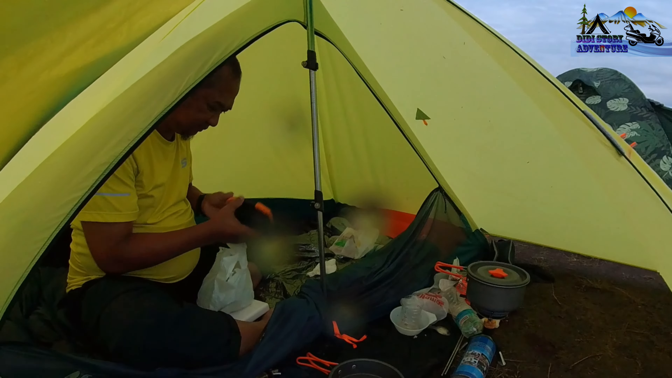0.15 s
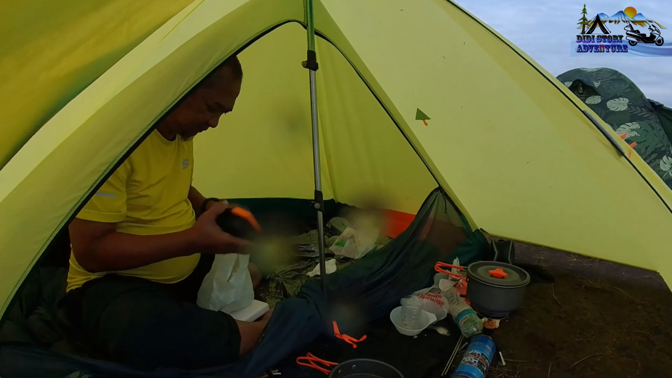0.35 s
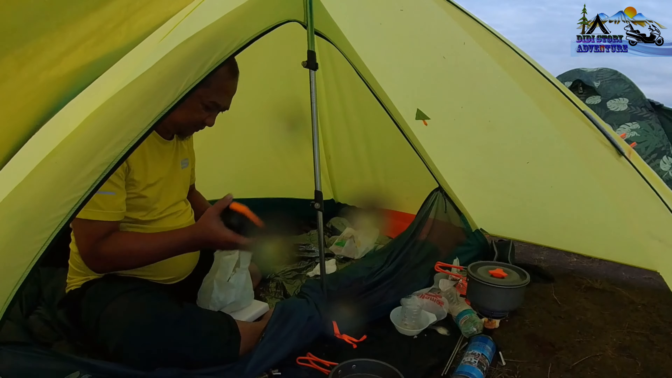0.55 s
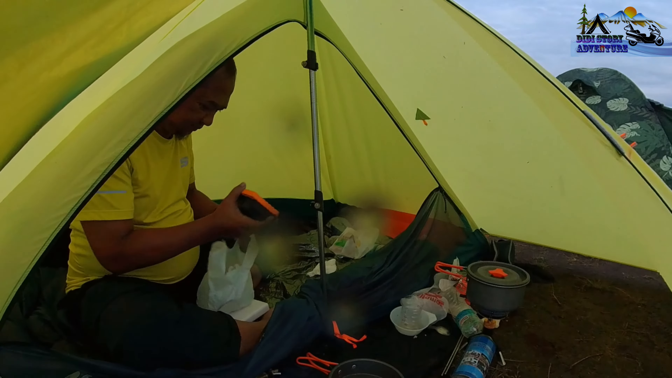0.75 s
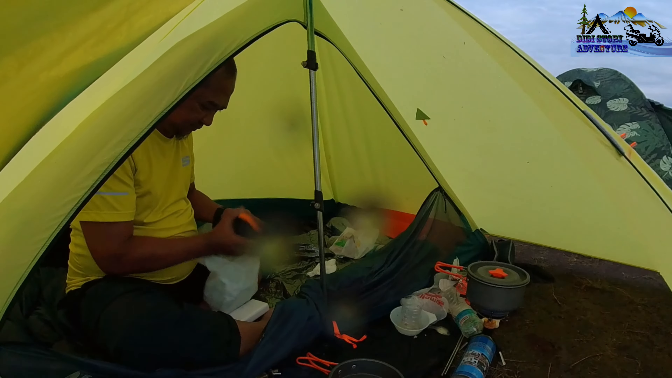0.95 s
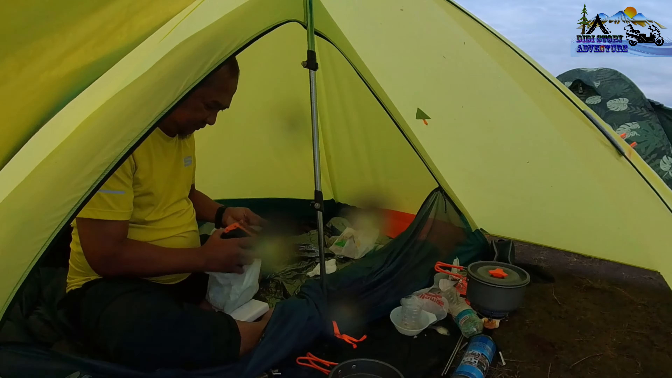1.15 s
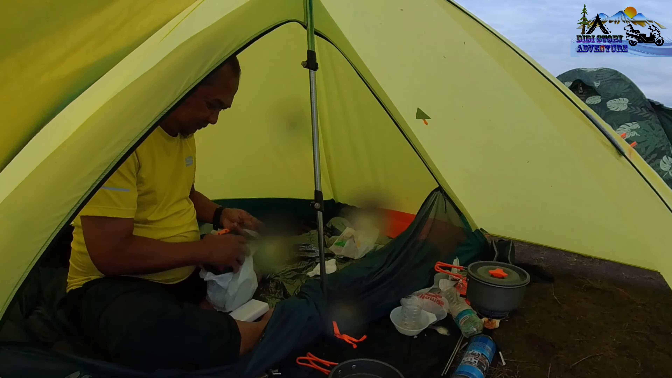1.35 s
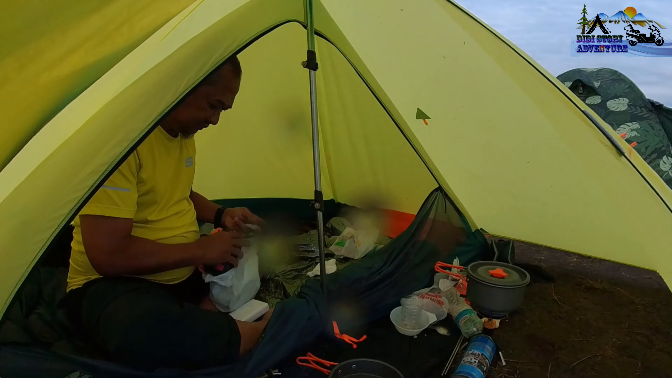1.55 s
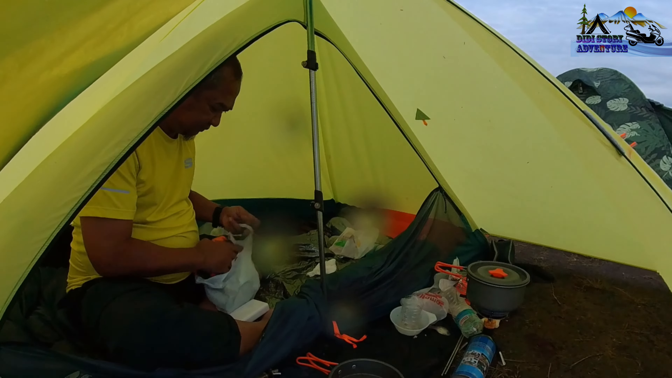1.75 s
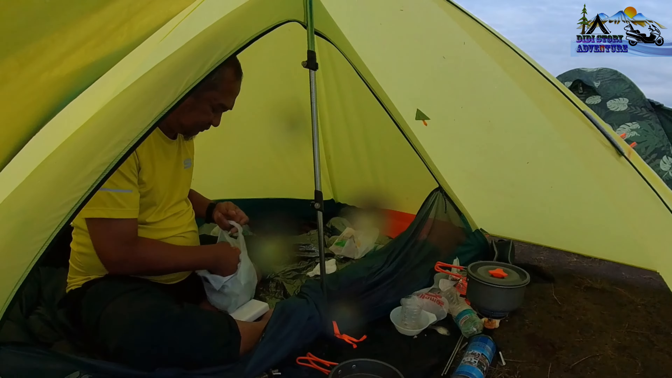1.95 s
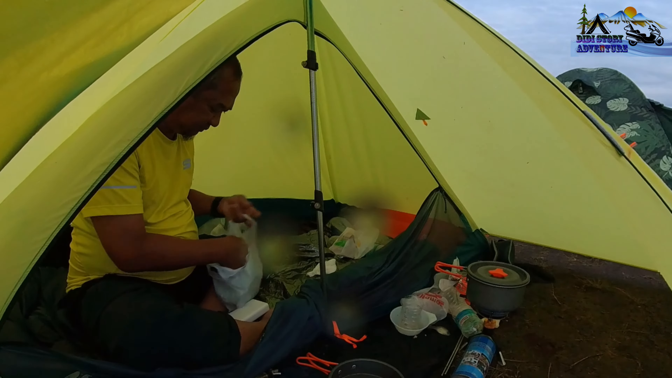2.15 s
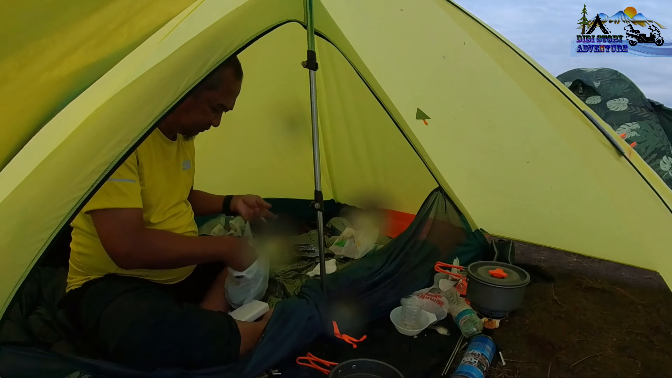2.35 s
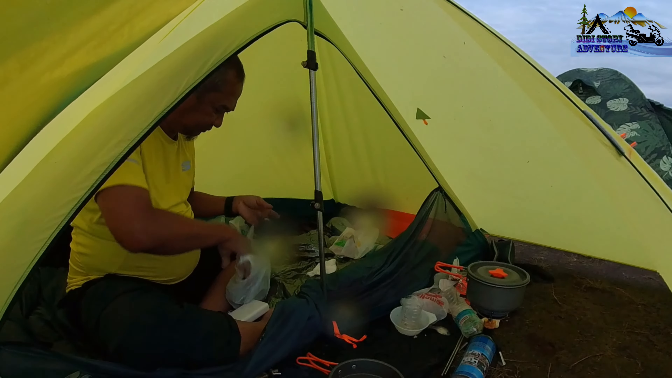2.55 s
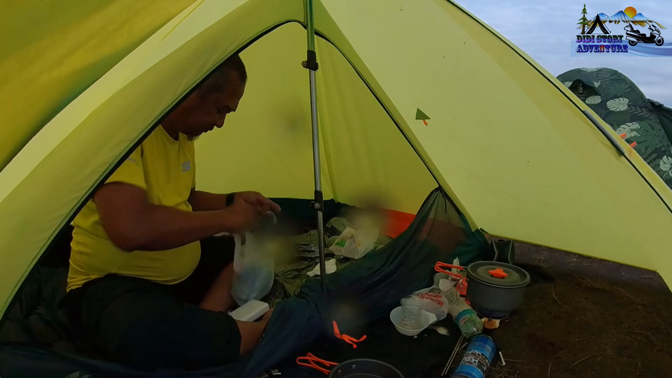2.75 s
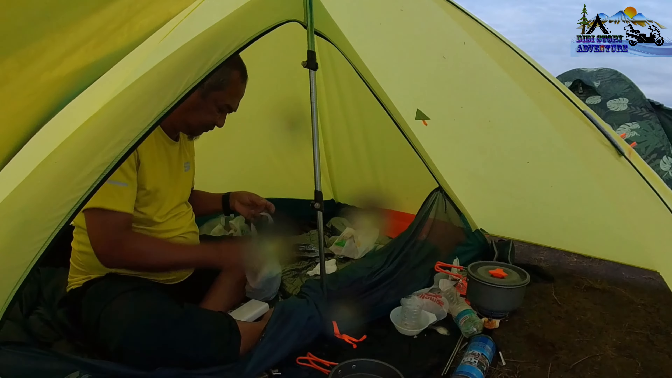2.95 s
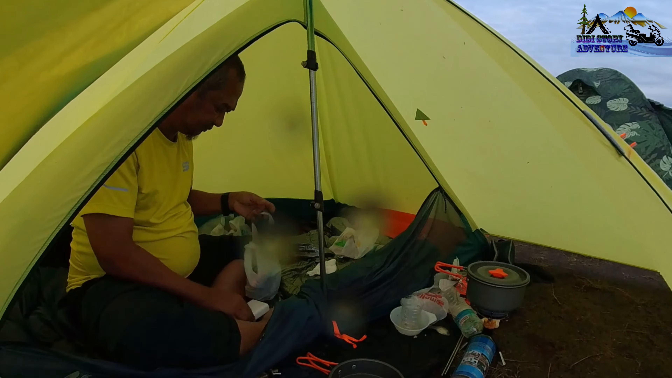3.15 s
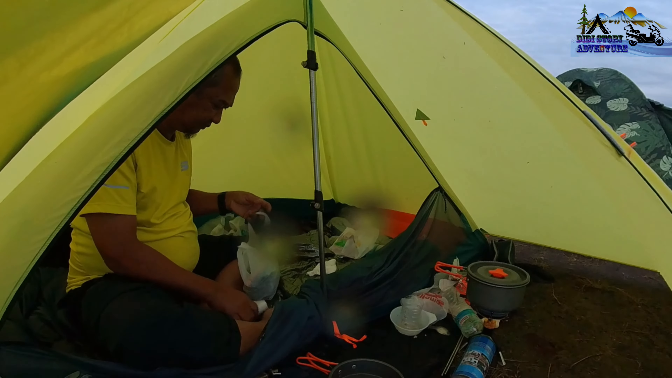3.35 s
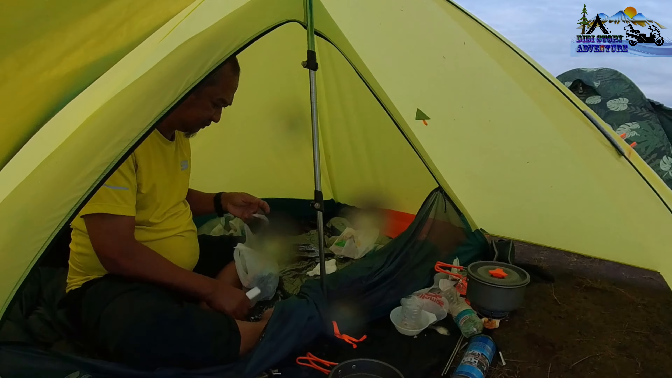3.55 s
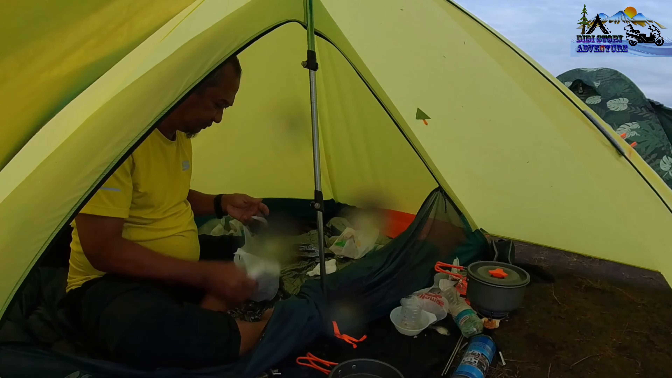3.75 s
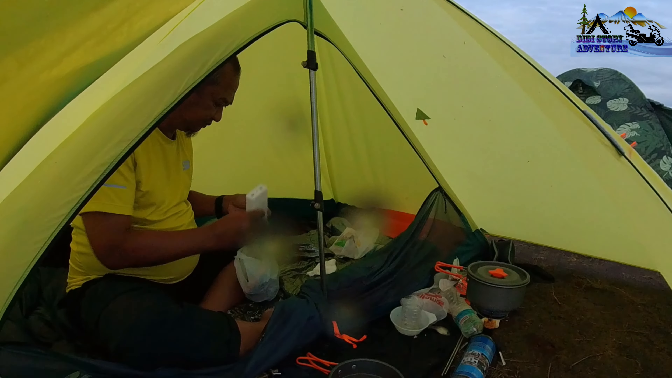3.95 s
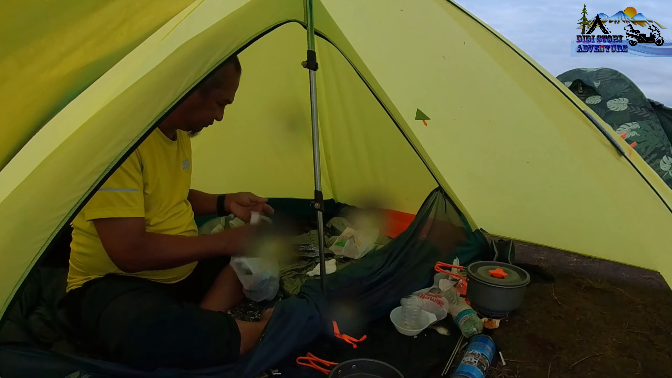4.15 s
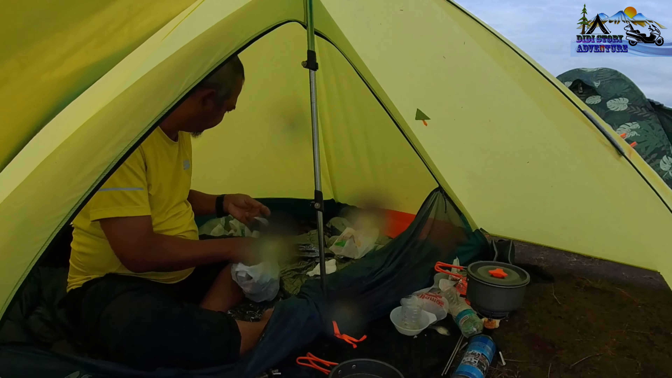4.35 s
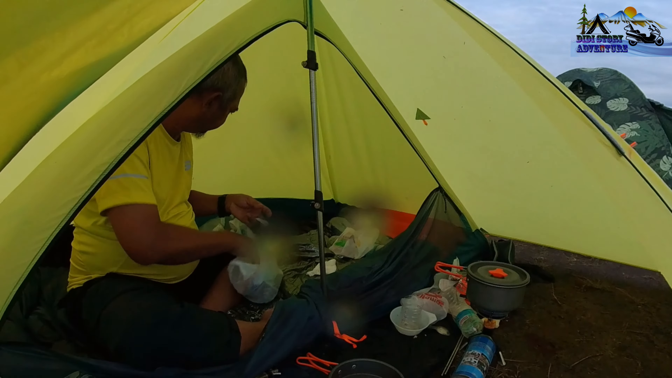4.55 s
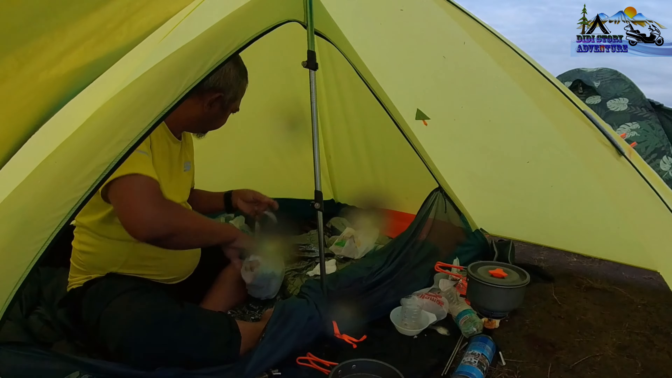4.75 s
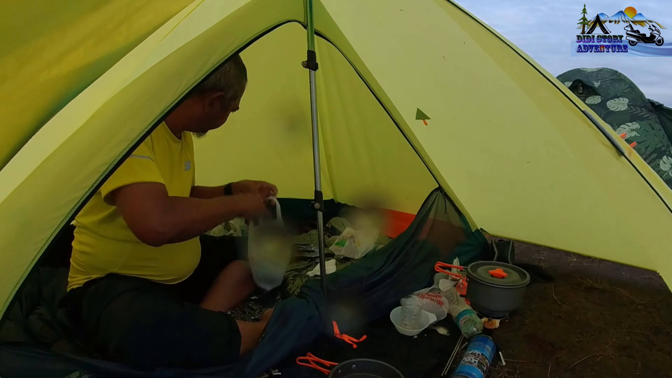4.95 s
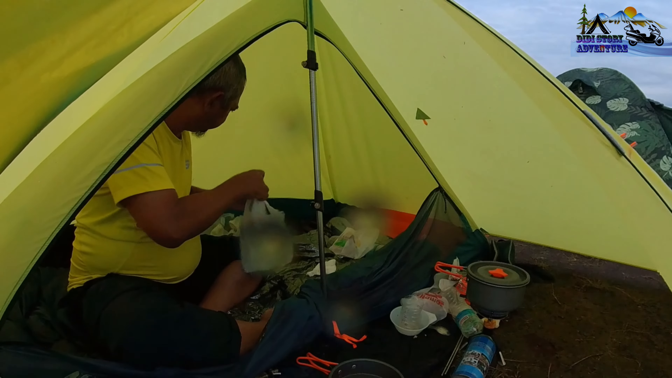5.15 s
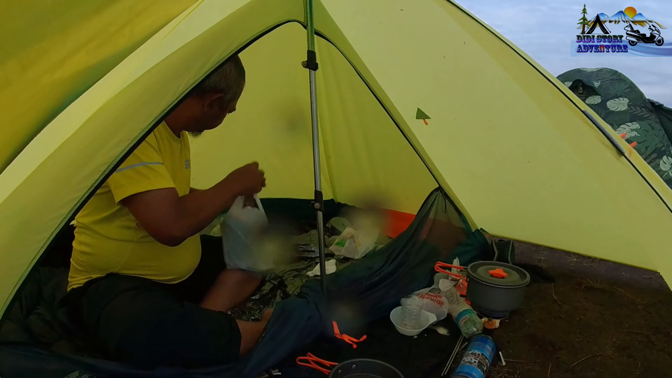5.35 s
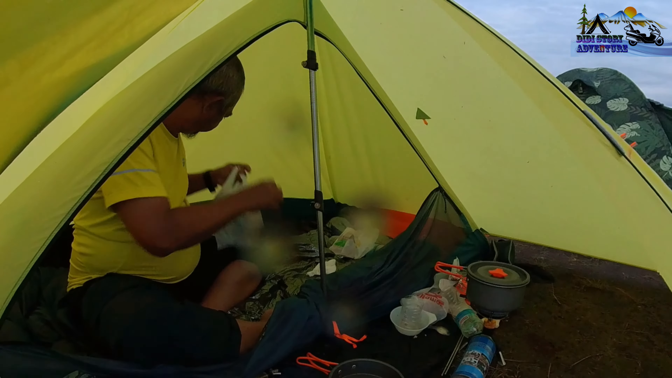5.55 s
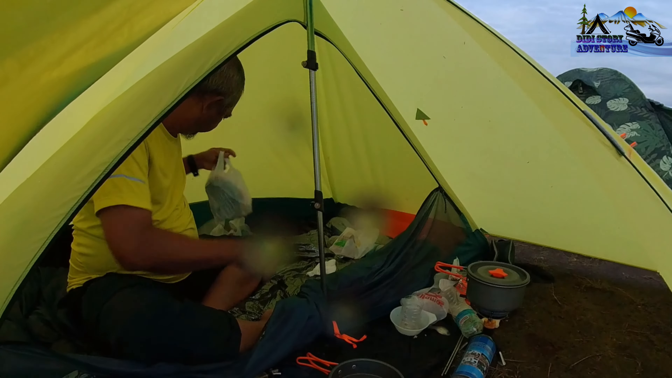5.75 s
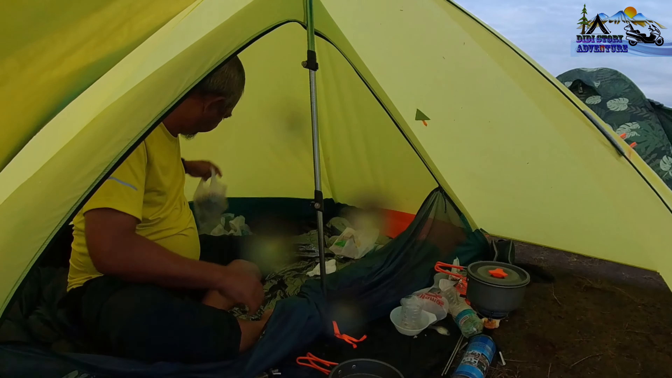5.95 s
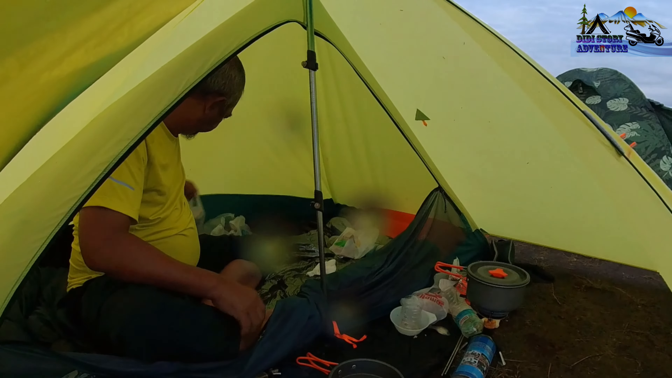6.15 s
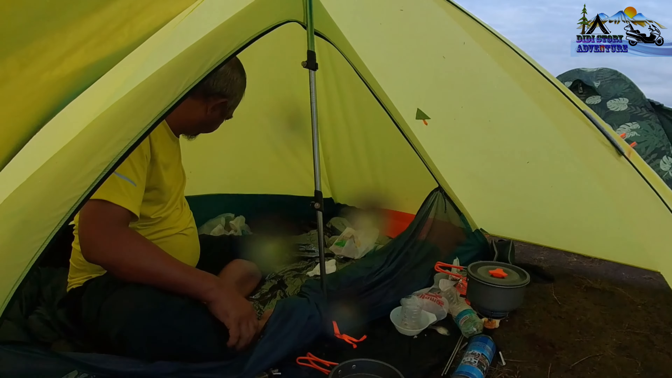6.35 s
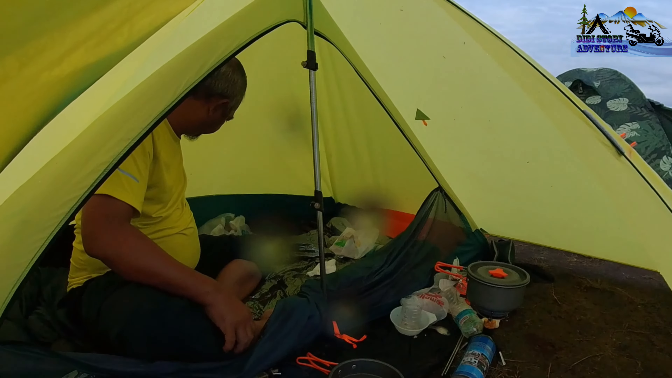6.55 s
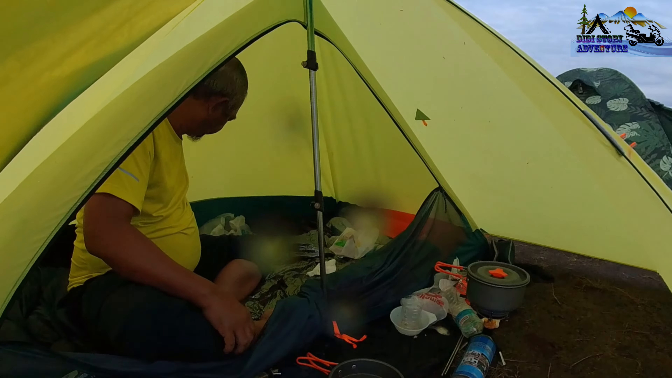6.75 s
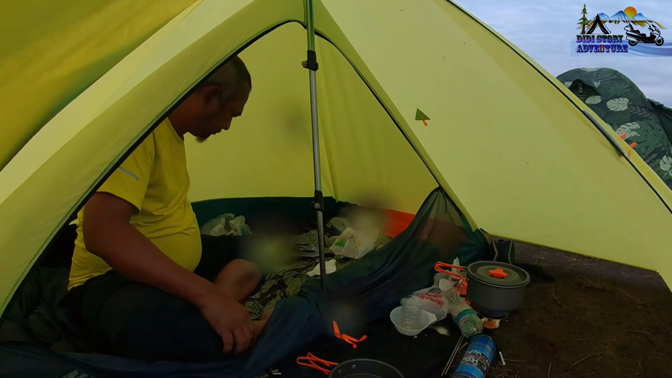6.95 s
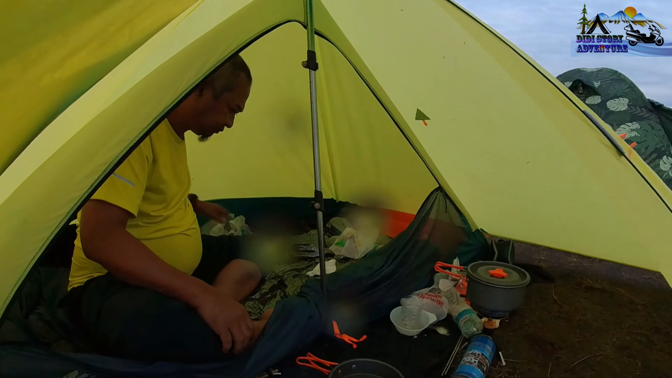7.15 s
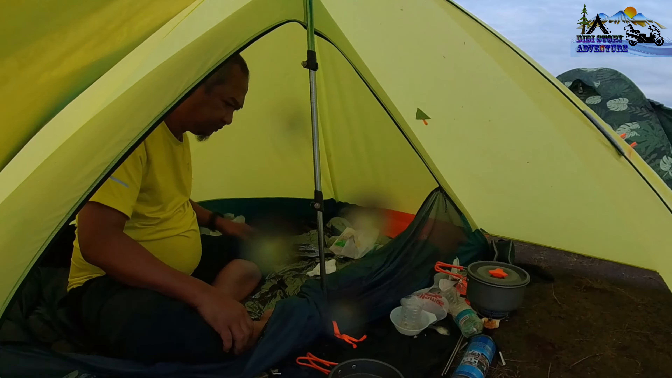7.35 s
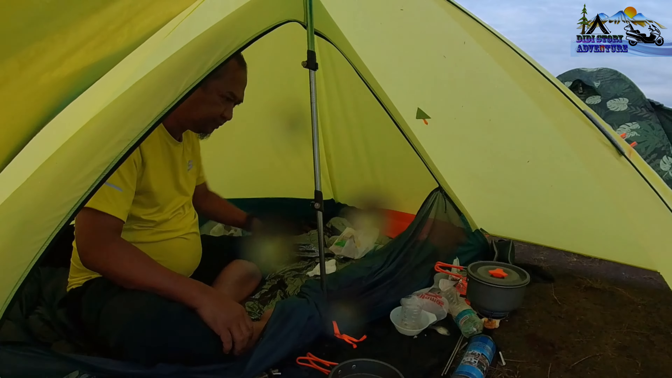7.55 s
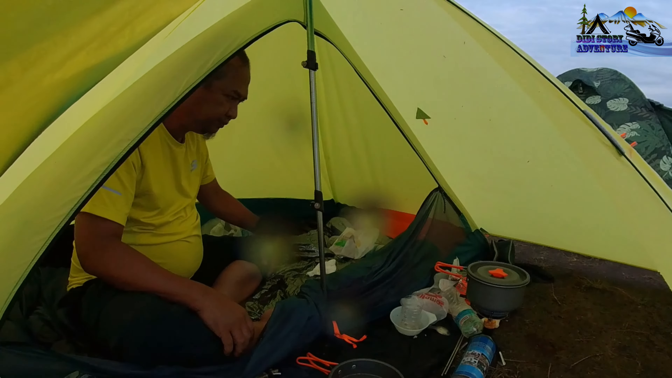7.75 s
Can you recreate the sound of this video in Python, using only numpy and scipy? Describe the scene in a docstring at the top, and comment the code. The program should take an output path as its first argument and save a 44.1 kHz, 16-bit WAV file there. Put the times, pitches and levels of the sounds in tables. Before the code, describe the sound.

A close, dry perspective inside a small tent, with very low, steady outdoor rumble and faint hiss. In the first 0.6 seconds a distant bird gives thin, fluttering whistles while plastic barely ticks. From 0.7 a thin bag is picked up and opened, with crisp bursts near 0.9, 1.1 and 1.4. From 1.6 to 3.2 gear is pushed in: dense bright crackle, sharp crumples, dull low throbs, and light knocks around 2.8. Rustling eases; a small hard case clacks in a quick cluster at 3.6. Gear knocks sharply at 4.4 and 4.7 with soft floor blows. The bag is lifted, crackling strongly to 5.2, then swung aside around 5.5. Quiet settling follows, with faint squeaks near 6.4. A muffled, flapping thump lands at 6.56, cloth drags until about 7.1, then near quiet with a very faint bird note at 7.6.

```python
"""Inside a tent, someone packs small gear into a thin plastic bag and puts it aside.
The bag crinkles in showers of tiny random snaps; a small case and loose gear clack as sets of dying tones.
Blows on the groundsheet are low dying tones with a flap, and clothing drags over it as coloured noise.
A far bird whistles in gliding tones, mostly at the start, over a low outdoor rumble of filtered noise."""
import sys
import numpy as np
from scipy import signal
from scipy.fft import rfft, irfft, next_fast_len
from scipy.io import wavfile
from scipy.ndimage import uniform_filter1d, map_coordinates

SR = 44100
rng = np.random.default_rng(int(sys.argv[2]) if len(sys.argv) > 2 else 0)


def to_wav(sig):
    """Store sig (one row per channel, or 1-D mono) as 16-bit WAV at the path in sys.argv[1].

    Samples outside -1..1 are clipped; the rate is SR.
    """
    pcm = np.clip(np.atleast_2d(sig), -1, 1) * 32767
    pcm = np.round(pcm).astype(np.int16)
    wavfile.write(sys.argv[1], SR, pcm.T)  # frames by channels


N = 348192  # length in samples
TIME = np.arange(N) / SR  # seconds


def amp(db):
    """Turn decibels into gain."""
    return 10 ** (np.asarray(db) / 20)


def unit(x):
    """Scale to an rms (average strength) of 1."""
    return x / np.sqrt(np.mean(x ** 2) + 1e-20)


def along(points, hz):
    """Read a curve of (Hz, value) points, joined on a log pitch axis."""
    point_hz, values = np.transpose(points)
    return np.interp(np.log(hz + 1), np.log(point_hz + 1), values)


def curves(rows):
    """Join the rows into one value per sample for each column after the time."""
    seconds, *columns = np.transpose(rows)
    return [np.interp(TIME, seconds, column) for column in columns]


def wobble(rate):
    """A smooth random curve through `rate` random points a second."""
    points = rng.standard_normal(int(N * rate / SR) + 4)
    return map_coordinates(points, [TIME * rate])


def dying(t, t60):
    """A fade that falls by 60 dB in t60 seconds."""
    return np.exp(-np.log(1000) * t / t60)


def filtered(x, response):
    """Multiply the spectrum of x by a response that depends on frequency."""
    size = next_fast_len(N + SR // 2)
    hz = np.fft.rfftfreq(size, 1 / SR)
    return irfft(rfft(x, size) * response(hz), size)[..., :N]


def coloured(x, spectrum):
    """Give white sound a spectrum while keeping its power."""
    return filtered(x, lambda hz: unit(amp(along(spectrum, hz))))


def add(track, s, sound):
    """Mix a sound into a track from time s, in seconds."""
    part = track[max(round(s * SR), 0):][:len(sound)]
    part += sound[:len(part)]


def patches(shape, frames):
    """A smooth random field over pitch and time, rms 1."""
    field = uniform_filter1d(rng.standard_normal(shape), size=3, axis=0)
    return unit(uniform_filter1d(field, size=frames, axis=1))


def crackle(rate, spread_db, hiss_db):
    """Tiny snaps of uneven size at random moments, `rate` a second, over a rubbing hiss, rms 1."""
    size_db = spread_db * np.clip(rng.standard_normal(N), -2, 2)
    size = amp(size_db) * rng.choice([-1, 1], N)
    snaps = unit(size * (rng.random(N) < rate / SR))
    return unit(snaps + amp(hiss_db) * rng.standard_normal(N))


def patchy(x, depth_db):
    """Each fold favours its own pitches for a moment: random patches get louder or softer."""
    z = signal.stft(x, nperseg=512)[2]
    z = z * amp(depth_db * patches(z.shape, 9))
    return unit(signal.istft(z, nperseg=512)[1][:N])


def swells(rows):
    """Short pure tones that swell and fade along a bell-shaped curve."""
    out = np.zeros(N)
    for s, hz, db, half_length in rows:
        bell = np.exp(-((TIME - s) / half_length) ** 2)
        out += amp(db) * bell * np.sin(2 * np.pi * (hz * TIME + rng.random()))
    return out


def ring(modes, scatter_db, attack=0.00078):
    """One blow on a body: its tones start at new random strengths and die away, peak 1."""
    hz, db, t60 = np.transpose(modes)[:, :, None]
    t = np.arange(SR // 4) / SR
    gain = amp(db + scatter_db * rng.standard_normal(hz.shape))
    wave = np.sum(gain * dying(t, t60) * np.sin(2 * np.pi * hz * t), axis=0)
    wave = wave * (1 - np.exp(-t / attack))
    return wave / np.abs(wave).max()


# Colour of the outdoor air. Each row: frequency in Hz, relative strength in dB.
AIR_COLOUR = [(12, -47), (20, -13), (74, 1.5), (161, 1), (340, -10), (501, -18), (1140, -26.5), (1560, -28),
              (2670, -23.5), (3200, -24.5), (3930, -24.5), (6750, -31), (7490, -14), (8520, -28),
              (9440, -36), (12300, -71), (20800, -120)]


def air():
    """Steady low outdoor rumble with a faint hiss: noise filtered to the colour of the air."""
    return amp(-62.5) * coloured(rng.standard_normal(N), AIR_COLOUR)


# Whistles of the far bird. Each row: start in seconds, length in seconds,
# pitch in Hz at the start, at the middle and at the end, relative level in dB.
BIRD_NOTES = [(.02, .08, 2960, 2900, 2900, -76), (.1, .17, 2714, 2694, 2810, -71),
              (.22, .13, 2740, 2880, 3100, -72), (0.384, 0.083, 2620, 2540, 2630, -66),
              (.43, 0.12, 2420, 2285, 2170, -76), (.52, .06, 2550, 2590, 2690, -67),
              (.565, 0.043, 2700, 2580, 2420, -63), (7.599, 0.23, 2210, 2000, 2140, -80)]
NOTE_FADE_S = 0.013  # rise and fall of a note


def bird(waver=0.0077, echo_db=-11, echo_t60=0.51):
    """Thin whistles, each one arc of pitch, that flutter over the distance, blurred by the hillside."""
    song = np.zeros(N)
    for start, length, first_hz, middle_hz, last_hz, db in BIRD_NOTES:
        progress = np.clip((TIME - start) / length, 0, 1)
        arc = np.polyfit([0, .5, 1], [first_hz, middle_hz, last_hz], 2)
        hz = np.polyval(arc, progress)
        gate = np.minimum(np.minimum(progress, 1 - progress) * length / NOTE_FADE_S, 1)
        level = amp(db + 2.7 * wobble(55))
        cycles = np.cumsum(hz * (1 + waver * wobble(116))) / SR
        song += gate * level * np.sin(2 * np.pi * cycles)
    t = np.arange(SR // 2) / SR
    tail = rng.standard_normal(len(t)) * dying(t, echo_t60)
    echo = signal.fftconvolve(song, tail / np.linalg.norm(tail))[:N]
    return song + amp(echo_db) * echo


# Soft blows on the tent floor. Each row: start in seconds, relative level in dB.
THUMPS = [(3.0, -39.5), (3.236, -43), (3.661, -48), (4.43, -42), (4.692, -32.5), (5.504, -38.5),
          (5.894, -54.5), (6.479, -47), (6.5589, -26.5)]
# Tones of the floor when struck. Each row: pitch in Hz, relative strength in dB, seconds to fall by 60 dB.
GROUND_TONES = [(120, -10, 0.12), (204, 3.5, 0.032), (286, 0, 0.049), (379, -1, 0.036), (560, 0.5, 0.036),
                (705, -7, 0.028), (1280, -14, 0.017)]
# Dull low throbs. Each row: loudest moment in seconds, pitch in Hz, level in dB,
# seconds from the crest until the level has dropped to about a third.
THROBS = [(1.73, 45, -45, 0.019), (2.118, 110, -41.5, 0.029), (2.19, 103.3, -51, 0.044),
          (2.263, 105.6, -44.5, 0.025), (2.395, 98.3, -48, 0.025), (4.49, 60.3, -59, 0.017),
          (5.53, 70.7, -44, 0.01), (5.905, 130, -53.5, 0.025)]
# Skin squeaking on the groundsheet. Each row: the same four columns as the throbs.
SQUEAKS = [(6.362, 1550, -58, 0.0051), (6.497, 1550, -55, 0.016)]
# Colour of a flexing sheet, also used for the bag. Each row: frequency in Hz, relative strength in dB.
SHEET_COLOUR = [(100, -12), (180, -2), (280, -14.5), (380, -7.5), (620, -3), (860, -1.5), (1080, -6.5),
                (1380, -7.5), (1800, -5), (2900, -1.5), (3700, -6), (5000, -5), (9000, -41)]
SLAP_DB, SLAP_S = -22.5, 0.01  # flapping under a blow: level relative to the blow, decay in seconds
# The weight sags in bumps: average spacing in seconds, level relative to the blow, fading in dB per second
SAG_S, SAG_DB, SAG_DB_PER_S = .016, -8, -60.5


def ground(count=11):
    """Soft blows that flap the groundsheet and sag to rest on it, squeaks, and a few dull throbs."""
    out = swells(THROBS) + swells(SQUEAKS)
    flap = np.zeros(N)
    t = np.arange(SR // 8) / SR
    for s, db in THUMPS:
        delays = SAG_S * (np.arange(count) + rng.uniform(.2, .8, count))
        sags = [(delay, SAG_DB + SAG_DB_PER_S * delay) for delay in delays]
        for delay, change_db in [(0.0034, 0.007)] + sags:  # the blow itself, then the sagging
            blow = ring(GROUND_TONES, scatter_db=1.5, attack=0.0016)
            add(out, s + delay, amp(db + change_db - 2.5) * blow)
            add(flap, s + delay, amp(db + change_db + SLAP_DB) * np.exp(-t / SLAP_S))
    return out + coloured(flap * rng.standard_normal(N), SHEET_COLOUR)


def stroke(start, length, attack, release):
    """Gain that rises, holds and dies away."""
    rise = np.clip((TIME - start) / attack, 0, 1)
    return rise * np.exp(-np.maximum(TIME - start - length, 0) / release)


# Cloth sliding over the groundsheet. Each row: start in seconds, length in seconds, relative level in dB.
SLIDES = [(0.71, .08, -69), (5.963, 0.23, -70), (6.249, .18, -67), (6.486, 0.29, -65), (6.825, 0.31, -63.5)]
# Colour of rubbing cloth. Each row: frequency in Hz, relative strength in dB.
CLOTH_COLOUR = [(300, -16), (560, -11), (870, -28), (1160, -4), (1400, -7.5), (1750, -6.5), (2500, 4),
                (3200, 5.5), (4100, 7.5), (5000, 6), (6500, 3), (9000, -55)]
SLIDE_ATTACK_S, SLIDE_RELEASE_S = 0.048, 0.04  # rise and fall of each slide


def cloth(drum_hz=730, drum_q=7, drum_db=-4):
    """Clothing drags over the groundsheet, which drones at one pitch under the rubbing."""
    level = sum(amp(db) * stroke(s, length, SLIDE_ATTACK_S, SLIDE_RELEASE_S) for s, length, db in SLIDES)
    rub = patchy(crackle(1500, spread_db=2, hiss_db=0), depth_db=1.6)
    b, a = signal.iirpeak(drum_hz, drum_q, SR)
    drum = unit(signal.lfilter(b, a, rng.standard_normal(N)))
    return level * (amp(11.5) * coloured(rub, CLOTH_COLOUR) + amp(drum_db) * drum)


# Colour of a hard click. Each row: frequency in Hz, relative strength in dB.
CLICK_COLOUR = [(200, -17.5), (800, -6), (2600, -3.5), (4000, -6.5), (7000, -4.5), (9000, -32.5)]


def contacts(rows, modes, click_t60, ring_db, click_db):
    """Hard contacts: each rings the body and gives a short click of noise."""
    body, clicks = np.zeros(N), np.zeros(N)
    t = np.arange(SR // 8) / SR
    for s, db, bright_db in rows:
        blow = ring(modes, scatter_db=1.5)
        add(body, s, amp(db + ring_db) * blow)
        add(clicks, s, amp(db + bright_db + click_db) * dying(t, click_t60))
    return body + coloured(clicks * rng.standard_normal(N), CLICK_COLOUR)


# Gear knocking together in the bag. Each row: start in seconds, relative level in dB,
# extra level of the click in dB.
KNOCKS = [(2.794, -31.5, -3), (2.822, -33, -10), (2.844, -29, -18), (2.996, -38.5, -26),
          (4.3631, -28.5, 14.5), (4.376, -40, 11), (4.4053, -18, -4), (4.4218, -22, 0), (4.659, -28, 14),
          (4.666, -26, -6), (4.682, -30.5, -4), (4.706, -34, -7), (4.74, -16, 1.5), (5.181, -32.5, 18.5),
          (5.496, -34, -2)]
# Tones of the gear. Each row: pitch in Hz, relative strength in dB, seconds to fall by 60 dB.
GEAR_TONES = [(263, -12.5, 0.1), (370, -7, 0.098), (464, 4, 0.049), (486, 12, 0.01), (710, 8, 0.0064),
              (895, 6, 0.023), (1040, 0, 0.03), (1327, 0, 0.021), (2000, -50, 0.042), (2496, -7, 0.027)]
RATTLE_S, RATTLE_DB = .011, -13  # rebound: average delay in seconds, level relative to the knock


def gear():
    """Gear knocks together inside the bag and rebounds once, more weakly, after each knock."""
    delays = RATTLE_S * rng.uniform(.6, 1.4, len(KNOCKS))
    rebounds = [(s + delay, db + RATTLE_DB, bright_db) for (s, db, bright_db), delay in zip(KNOCKS, delays)]
    return contacts(list(KNOCKS) + rebounds, GEAR_TONES, click_t60=0.023, ring_db=-4.0, click_db=-13.5)


# The small case tapping. Each row: start in seconds, relative level in dB, extra level of the click in dB.
CLACKS = [(3.235, -39.5, -9), (3.5806, -13.5, -1), (3.6095, -18, 3), (3.6222, -17, -1), (3.834, -46.5, -20)]
# Tones of the case. Each row: pitch in Hz, relative strength in dB, seconds to fall by 60 dB.
CASE_TONES = [(953, 1, 0.048), (1038, -0.5, 0.03), (1120, -15.5, 0.0099), (1360, -7.5, 0.032),
              (2420, -17, 0.025)]


def case():
    """A small hard case clacks: each tap rings its tones and clicks."""
    return contacts(CLACKS, CASE_TONES, click_t60=0.0327, ring_db=-7.0, click_db=-22)


# Folds that give way at once. Each row: start in seconds, relative level in dB.
CRUMPLES = [(0.2873, -42.5), (0.3466, -40), (0.4, -39), (0.683, -41.5), (0.9065, -21.5), (1.1293, -21.5),
            (1.3841, -20), (1.6213, -26), (1.6497, -31), (1.904, -17.5), (2.4812, -18), (2.706, -17),
            (2.7927, -15.5), (3.2325, -30), (3.5771, -18.5), (4.061, -40.5), (4.092, -41), (4.2523, -34),
            (4.8554, -19.5), (5.146, -14), (5.9123, -43), (6.11, -30.5), (6.2485, -32)]
# Colour of crinkling plastic, also used for the bag. Each row: frequency in Hz, relative strength in dB.
FILM_COLOUR = [(700, -32.5), (1300, -24.5), (1800, -16.5), (3000, -24), (3900, -10), (4700, -8),
               (5400, -3.5), (6400, 1), (7150, 2), (7700, -1), (8500, -10.5), (9050, -23), (9450, -70)]
FOLD_ATTACK_S, FOLD_DECAY_S = 0.00059, 0.0073  # rise and fall of a fold's shower of snaps
FOLD_BODY_DB = -24  # flexing that goes with a fold, relative to the fold's level
JOLT_DB, JOLT_BODY_DB = -3.5, -14  # snaps and flexing set off by a knock, relative to the knock


def crumples():
    """A fold gives way, by itself or jolted by a knock: a sudden burst of noise that thins out."""
    sharp, dull = np.zeros(N), np.zeros(N)
    t = np.arange(SR // 5) / SR
    shape = np.exp(-t / FOLD_DECAY_S) * (1 - np.exp(-t / FOLD_ATTACK_S))
    folds = [(s, db, db + FOLD_BODY_DB) for s, db in CRUMPLES]
    jolts = [(s, db + JOLT_DB, db + JOLT_BODY_DB) for s, db, _ in KNOCKS]
    for s, db, body_db in folds + jolts:
        add(sharp, s, amp(db - 11.5) * shape)
        add(dull, s, amp(body_db) * shape)
    snaps, flex = rng.standard_normal((2, N))
    return coloured(snaps * sharp, FILM_COLOUR) + coloured(flex * dull, SHEET_COLOUR)


def avalanches(rate, life, steady):
    """Gain of rms 1 that jumps at uneven moments and falls back within milliseconds."""
    moments = np.cumsum(rng.gamma(2, .5, size=4000)) * SR / rate
    starts = np.bincount(moments[moments < N].astype(int), minlength=N) * rng.random(N)
    return unit(steady + signal.lfilter([1], [1, -np.exp(-1 / (life * SR))], starts))


# How hard each hand movement works the plastic.
# Each row of the nine curves: time in seconds, relative crinkle level in dB.
# Gear is turned over above the bag.
TURN = [(0.0, -59), (0.42, -65.5), (0.5, -85), (0.57, -78.5), (0.67, -92.5)]
# The bag is picked up and opened.
OPEN = [(0.69, -52.5), (0.78, -56), (0.85, -59.5), (0.91, -42.5), (1.04, -46.5), (1.15, -41.5),
        (1.22, -43.5), (1.37, -41.5), (1.49, -42.5), (1.51, -47), (1.57, -43.5), (1.61, -51)]
# Gear is pushed down into it.
STUFF = [(1.63, -44), (1.72, -36), (1.75, -42), (2.06, -37.5), (2.15, -44), (2.19, -41), (2.27, -40),
         (2.29, -35), (2.43, -40.5), (2.59, -38), (2.61, -42), (2.81, -36), (2.86, -40), (2.91, -34.5),
         (2.98, -43), (3.0, -40), (3.28, -58.0)]
# The bag hangs from one hand while the other fetches the case.
FETCH = [(3.31, -50.5), (3.47, -56), (3.57, -44), (3.65, -51), (3.71, -44), (3.73, -55.5), (3.98, -50),
         (4.05, -65.0), (4.2, -56)]
# The case goes in.
DROP = [(4.24, -58.5), (4.36, -40), (4.43, -42.5), (4.46, -52), (4.55, -43.5), (4.68, -36.5), (4.8, -46)]
# The bag is lifted.
LIFT = [(4.84, -40), (4.95, -40), (4.97, -39.5), (5.17, -39.5), (5.3, -52.5)]
# The bag is swung aside.
SWING = [(5.34, -46.5), (5.46, -42), (5.49, -35), (5.54, -48), (5.61, -47), (5.65, -53), (5.67, -42),
         (5.84, -59)]
# The bag is put down.
SETTLE = [(5.89, -58), (5.97, -51), (6.24, -54), (6.36, -49), (6.54, -53)]
# The groundsheet crinkles as the sitter leans on it and reaches out.
LEAN = [(6.56, -49), (6.69, -42.5), (6.72, -50), (7.09, -50.5), (7.24, -58), (7.27, -68), (7.37, -78),
        (7.58, -62.5), (7.89, -70.5)]
# The movements in turn. Each row: crinkle curve, flexing of the whole sheet in dB
# relative to the crinkle of a firm grip.
MOVEMENTS = [(TURN, -31), (OPEN, -9.5), (STUFF, -11.5), (FETCH, -16), (DROP, -14), (LIFT, -12.5),
             (SWING, -7.5), (SETTLE, -39), (LEAN, -13)]
FIRM_DB = -39  # crinkle of a firm grip, past which the sheet flexes no further
FLEX_GROWS = 1.316  # dB of flexing per dB of crinkle up to there


def bag():
    """Creases snap in little avalanches, more often the harder the film is worked; the sheet flexes."""
    rows = [(s, db, slack_db) for move, slack_db in MOVEMENTS for s, db in move]
    crinkle_db, slack_db = curves(rows)
    flex_db = FIRM_DB + slack_db + FLEX_GROWS * np.minimum(crinkle_db - FIRM_DB, 0)
    clumps_db = 0.5 * wobble(90) + 0.58 * wobble(24)
    rate = 1200 * amp(.5 * (crinkle_db - crinkle_db.max()))  # snaps a second
    surge = avalanches(rate=260, life=0.0028, steady=1.0)
    snaps = patchy(crackle(rate, spread_db=3.5, hiss_db=7.5), depth_db=2.0)
    flex = patchy(crackle(rate, spread_db=2.5, hiss_db=2.5), depth_db=1.8)
    crinkle = coloured(snaps * surge * amp(crinkle_db + clumps_db + 0.92), FILM_COLOUR)
    return crinkle + coloured(flex * surge * amp(flex_db + clumps_db + 6.0), SHEET_COLOUR)


def reflections(x, t60):
    """Scatter off the floor, arms and tent walls; its random pattern is redrawn 25 times a second."""
    hop = SR // 25  # the patterns blend through overlapping windows
    t = np.arange(SR // 40) / SR
    out = np.zeros(N)
    window = signal.get_window("hann", 2 * hop)
    for start in range(0, N - 2 * hop, hop):
        tail = rng.standard_normal(len(t)) * dying(t, t60)
        piece = x[start:start + 2 * hop] * window
        add(out, start / SR, signal.fftconvolve(piece, tail / np.linalg.norm(tail)))
    return out


# Gain of the left-right difference. Each row: frequency in Hz, gain in dB.
SIDE_GAIN = [(2700, -84.5), (3100, -8), (4200, -5.5), (5500, -6.5), (6900, -13.5), (7700, -52)]


def spread(x):
    """Spread the treble: a randomly varying, phase-turned copy is added left and subtracted right."""
    z = signal.stft(x, nperseg=256)[2]
    turned = signal.istft(1j * z * patches(z.shape, 7), nperseg=256)[1][:N]
    side = filtered(turned, lambda hz: amp(along(SIDE_GAIN, hz)))
    return np.array([x + side, x - side])


def scene():
    """All the handling sounds inside the tent, with the outdoors behind."""
    outdoors = air() + bird()
    rustle = cloth() + crumples() + bag()
    rustle = amp(-1.8) * (rustle + amp(-5.0) * reflections(rustle, t60=0.064))
    return spread(outdoors + ground() + gear() + case() + rustle)


TOP_HZ = 9250  # band limit of the microphone


def record(dry):
    """The microphone keeps almost nothing above its band limit: a very steep treble cut."""
    return filtered(dry, lambda hz: 1 / np.sqrt(1 + (hz / TOP_HZ) ** 120))


dry = scene()
out = record(dry)
to_wav(out)
```